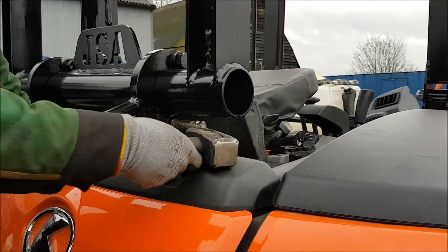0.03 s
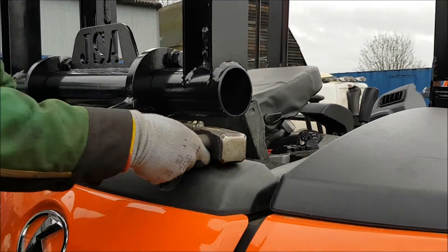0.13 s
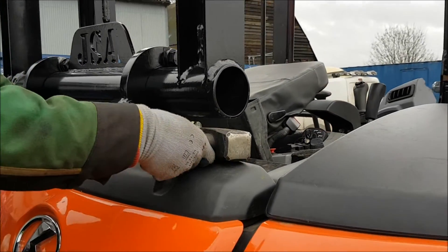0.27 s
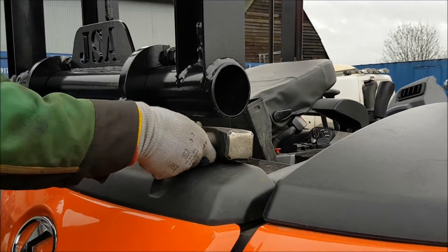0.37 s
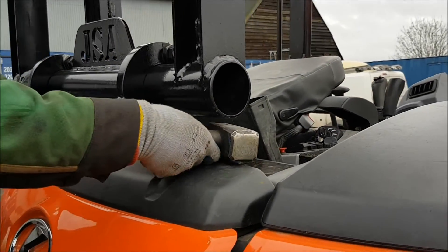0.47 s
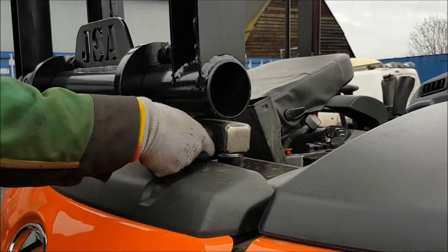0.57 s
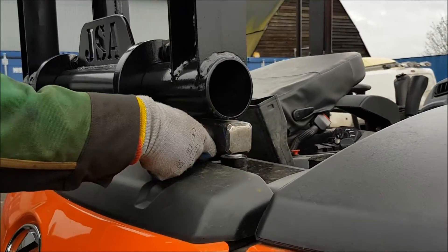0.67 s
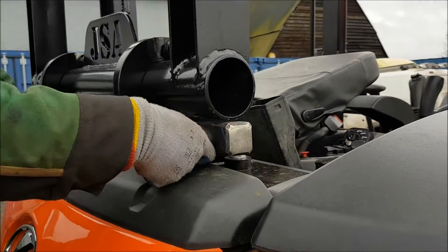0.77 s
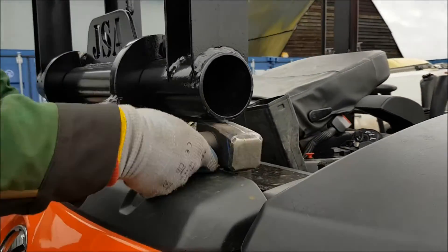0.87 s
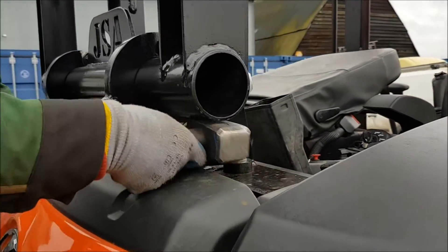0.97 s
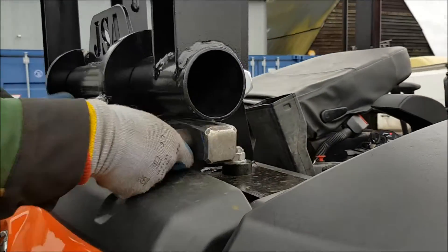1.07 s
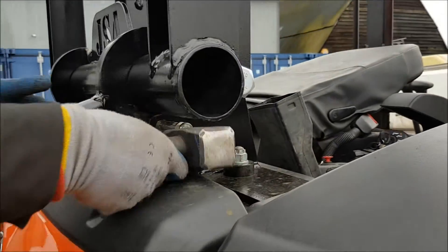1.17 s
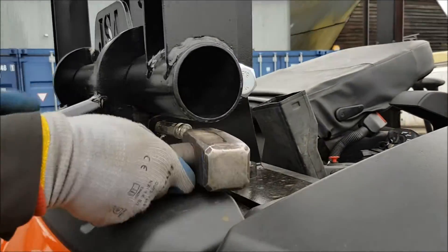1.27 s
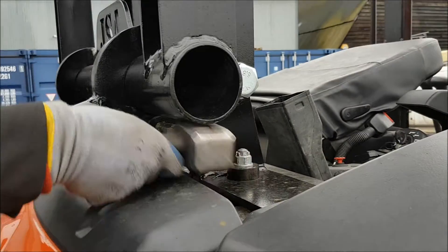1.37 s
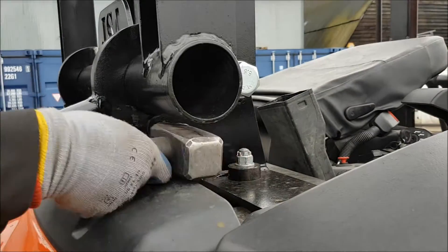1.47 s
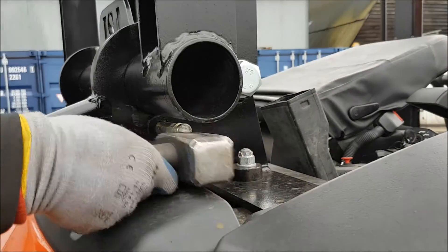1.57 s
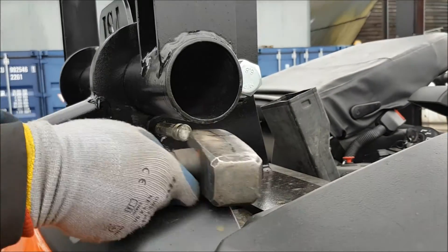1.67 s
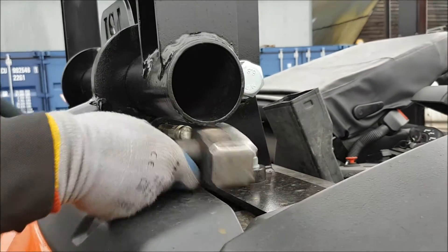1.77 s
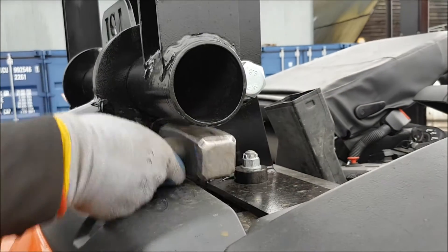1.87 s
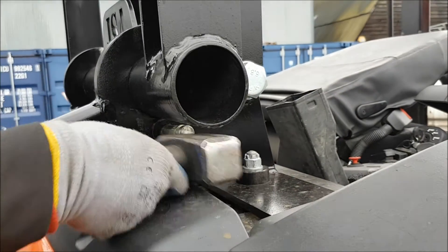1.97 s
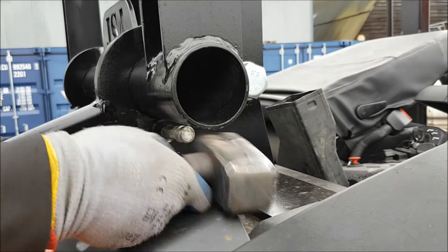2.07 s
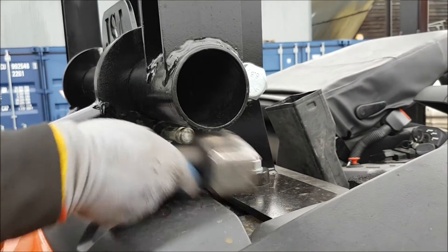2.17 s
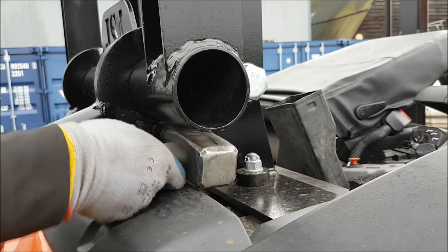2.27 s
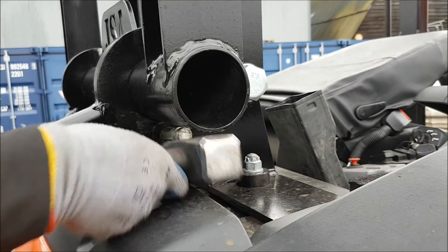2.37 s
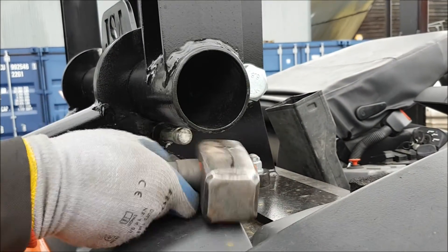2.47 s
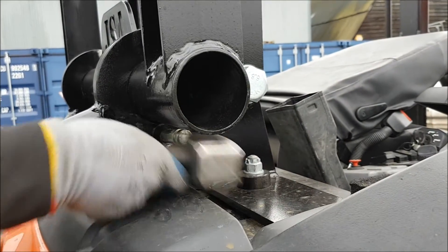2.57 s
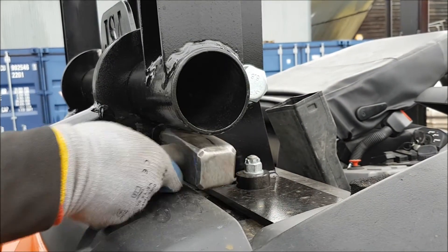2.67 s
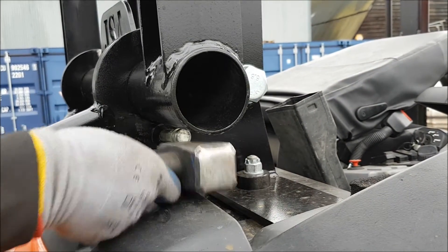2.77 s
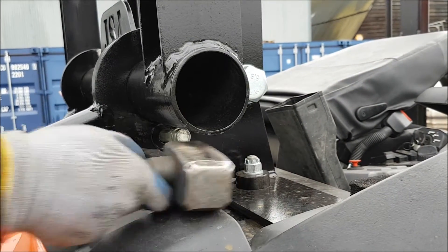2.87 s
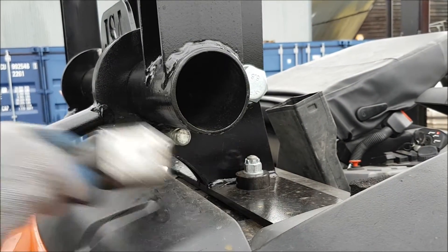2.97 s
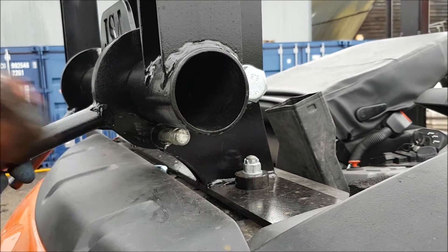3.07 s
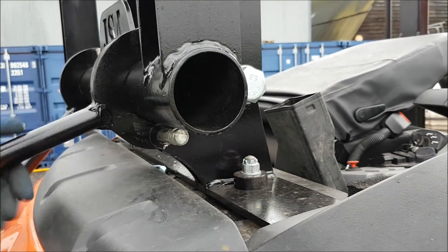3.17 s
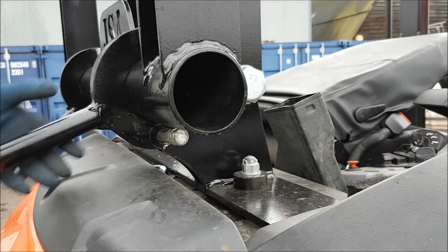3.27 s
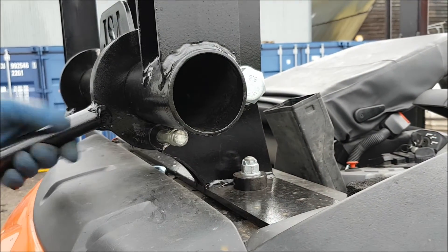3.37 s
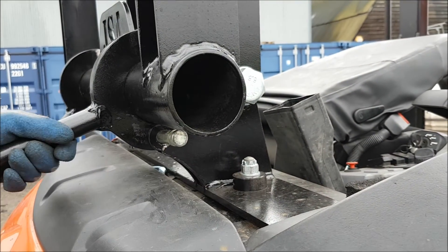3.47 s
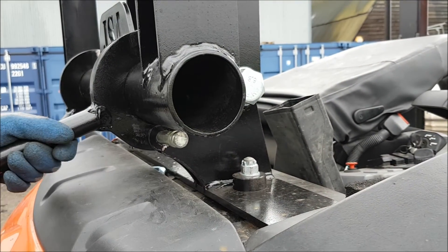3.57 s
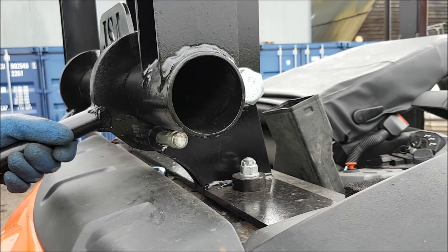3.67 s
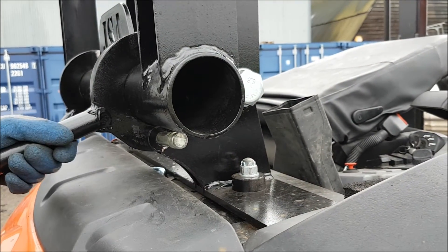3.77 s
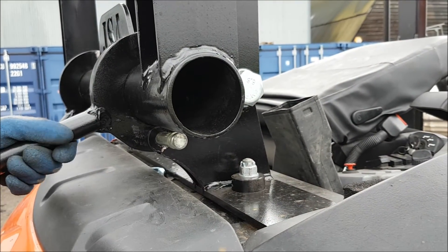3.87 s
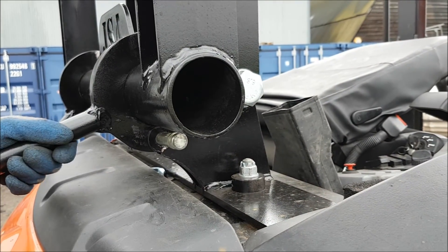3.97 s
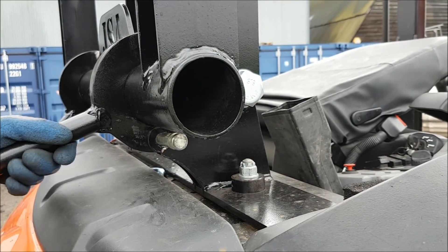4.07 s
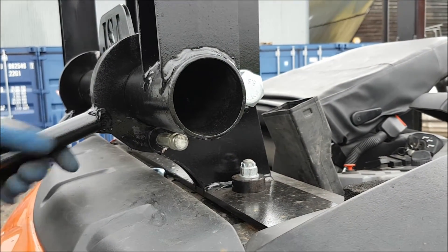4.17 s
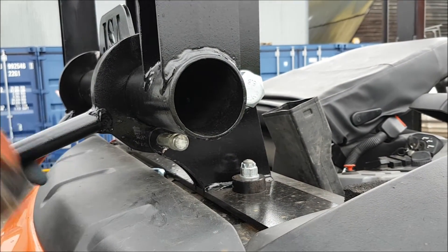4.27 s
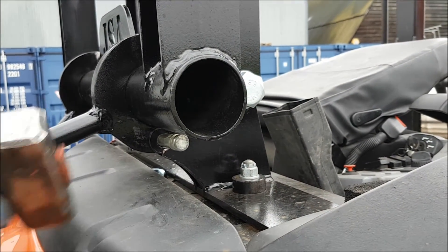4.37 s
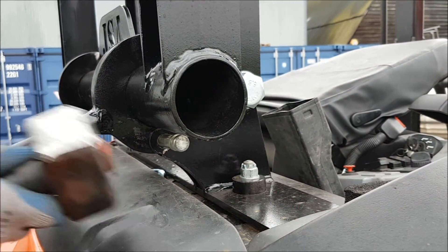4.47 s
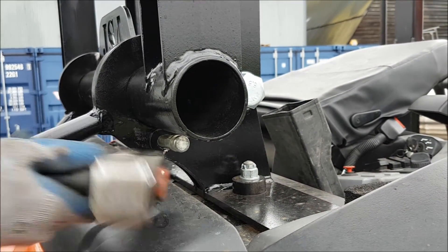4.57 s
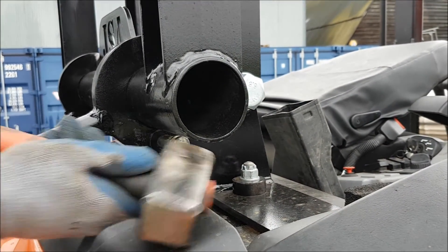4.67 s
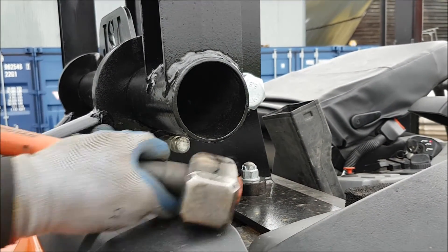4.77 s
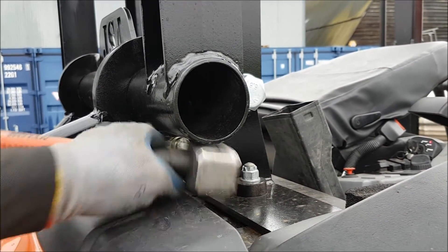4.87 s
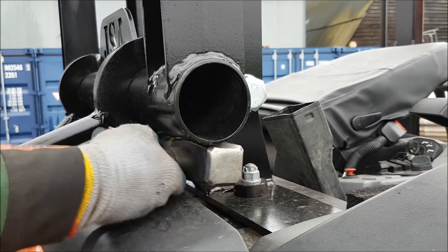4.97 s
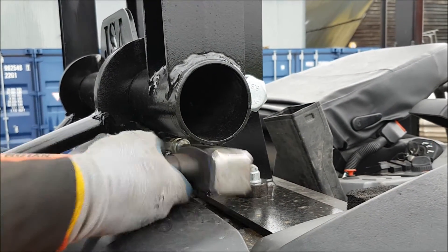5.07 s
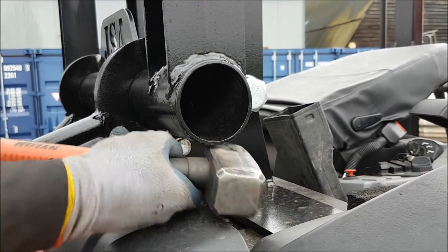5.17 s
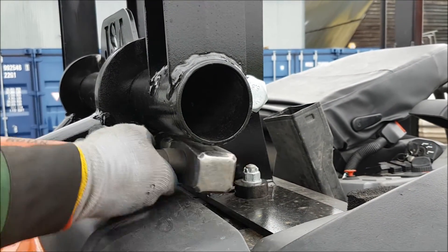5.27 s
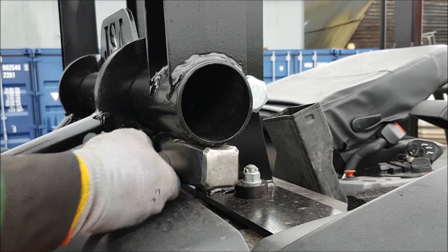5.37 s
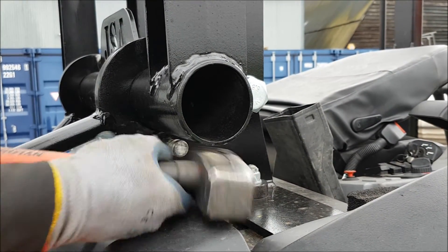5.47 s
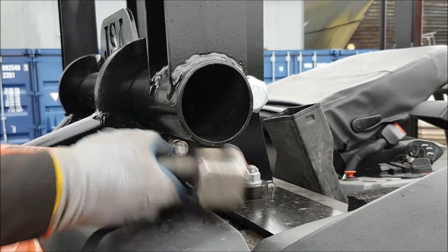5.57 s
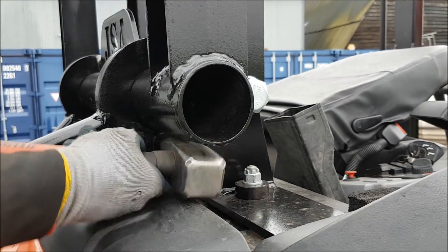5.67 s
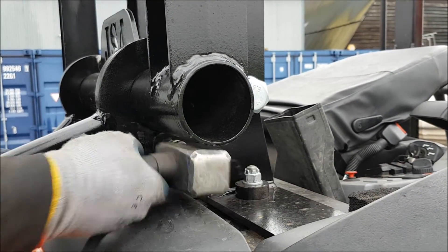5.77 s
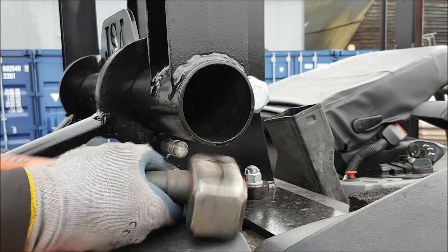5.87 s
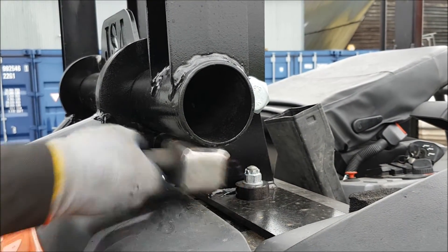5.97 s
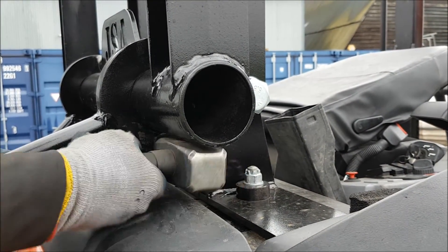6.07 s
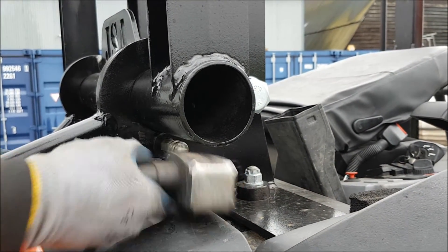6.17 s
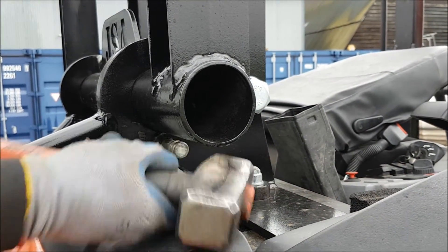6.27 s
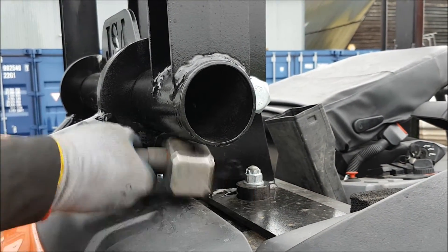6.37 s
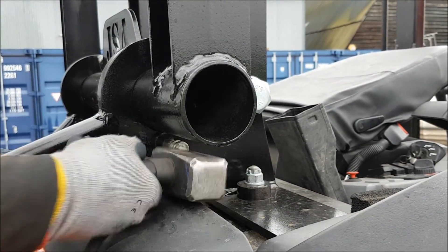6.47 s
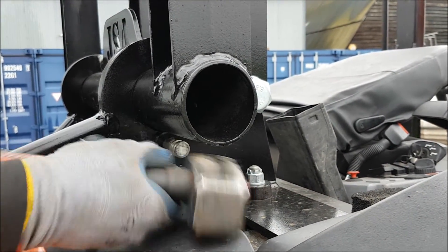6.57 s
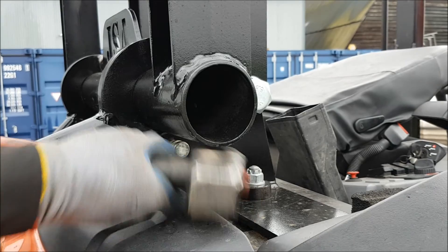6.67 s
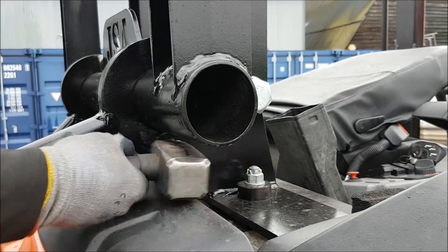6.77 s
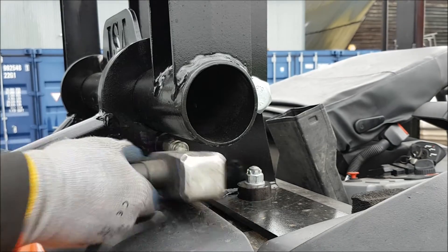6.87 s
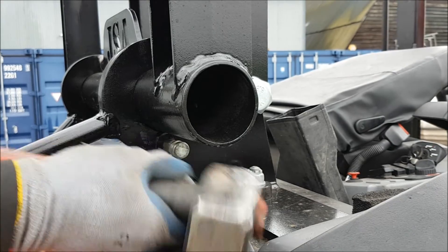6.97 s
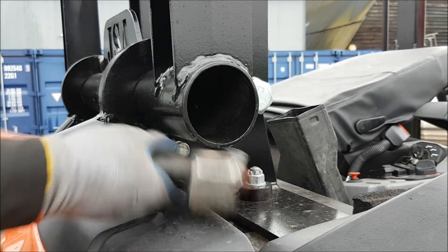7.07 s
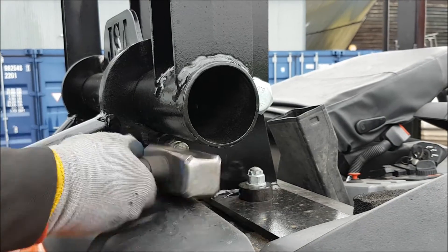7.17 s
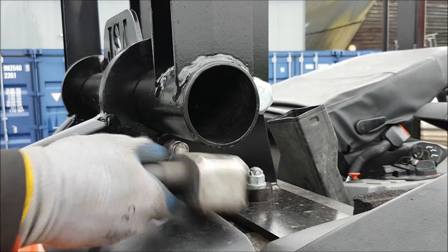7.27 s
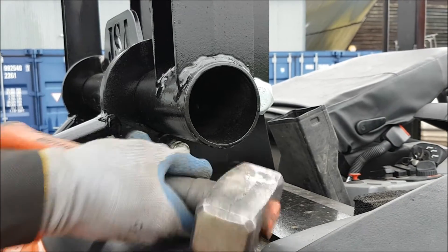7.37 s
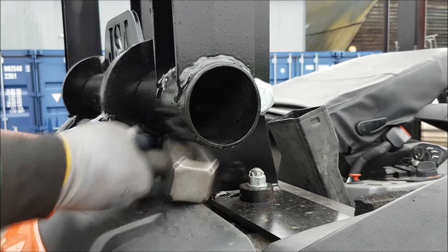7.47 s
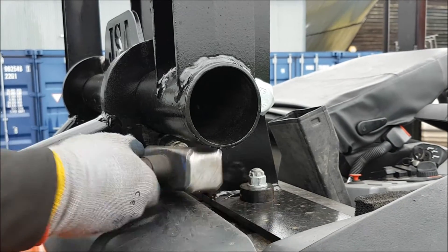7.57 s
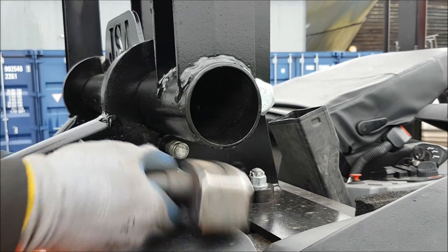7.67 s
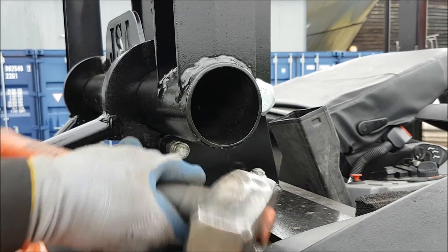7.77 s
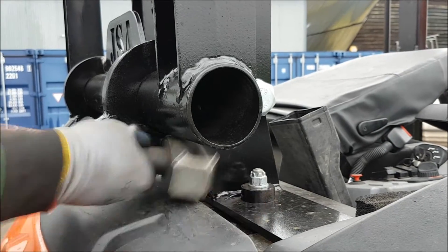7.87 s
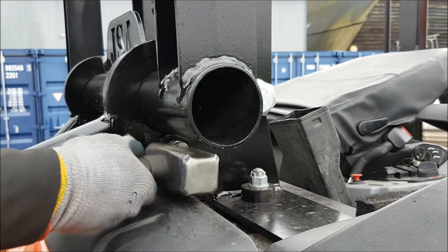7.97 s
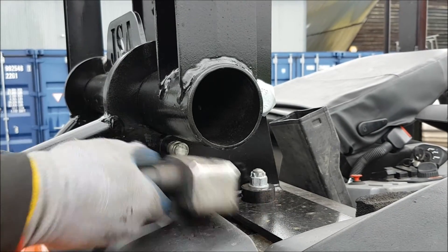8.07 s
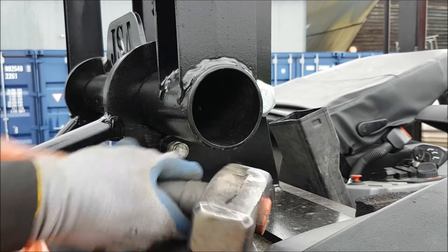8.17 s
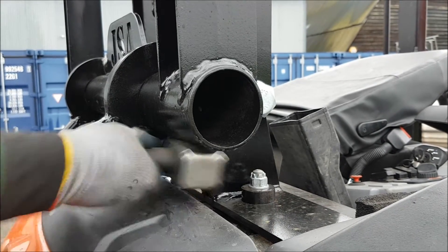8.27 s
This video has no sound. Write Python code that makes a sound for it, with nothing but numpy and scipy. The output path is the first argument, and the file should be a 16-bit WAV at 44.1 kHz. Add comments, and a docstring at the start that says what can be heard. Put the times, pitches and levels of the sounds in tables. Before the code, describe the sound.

A hammer drives a steel pin into a tractor frame outdoors, with sharp, clanging metal blows in two steady runs.

```python
"""A club hammer drives a steel hinge pin into a small tractor's lifting frame, outdoors, close to a phone.
Each blow cracks, clangs the bracket and rings through the bolted frame; some leave the pin singing.
The loose joint knocks before and after blows, the hammer bounces twice, and two blows land on the far side.
Two soft handling thumps and a gust hit the microphone at first; later there is only a light breeze.
A gloved hand bumps the bonnet, a forearm rubs it and a sleeve rustles over the steady sound of the yard."""
import sys
import numpy as np
from scipy import signal
from scipy.fft import rfft, irfft, next_fast_len
from scipy.io import wavfile
from scipy.ndimage import uniform_filter1d

SR = 44100
rng = np.random.default_rng(int(sys.argv[2]) if len(sys.argv) > 2 else 0)


def wav_out(sig):
    """Save sig, one row per channel (or a flat mono array), as 16-bit PCM at SR to the path in sys.argv[1]."""
    wavfile.write(sys.argv[1], SR, np.round(np.clip(np.atleast_2d(sig).T, -1, 1) * 32767).astype(np.int16))


N = 366471

# Levels in the tables are relative: each layer adds its own trim. Hardness is a treble gain.
# The tone of the frame's crowd of close modes. Each row: frequency in Hz, level in dB per third octave.
FRAME_COLOUR = [(50, -39.5), (110, -17.5), (160, -10), (220, -16.5), (320, -5.5), (500, -10), (750, -19),
                (1000, -10.5), (2000, -10), (2800, -12), (4000, -5), (5500, -13.5), (8500, -5), (11000, -6),
                (15000, -16)]
# The crowd's base envelope, which each kind of contact reshapes. Each row: frequency in Hz,
# rise in seconds, t60 in seconds, tail level in dB, tail t60 in seconds.
FRAME_DECAY = [(101.8, 0.0071, 0.6, -15, 1.3), (300, 0.0036, 0.25, -5, 0.86),
               (600, 0.00096, 0.35, -10.5, 1.07), (1180, 0.0013, 0.31, -17, 0.47),
               (2400, 0.00044, 0.21, -18, 0.54), (4807, 0.00046, 0.18, -24, 0.49),
               (14300, .0004, 0.14, -40, 1.4)]
# The frame's clear notes. Each row: pitch in Hz, t60 in seconds, level in dB when struck at the pin,
# level in dB when struck on the far side.
FRAME_MODES = [(93, 1.1, -33, -12.5), (123.5, 0.69, -19.5, -43), (154.7, 0.45, -26.5, -6.5),
               (296, 1.75, -19, -20), (332, 0.37, -14, -25.5), (389, 0.87, -28, -13.5),
               (423, 0.27, -30.5, -43), (531, 0.58, -13.5, -8), (589, 1, -19, -18.5),
               (638.5, 0.69, -18.5, -6.5), (669, 0.92, -26.5, -27), (1146, 0.2, -22.5, -32.5),
               (1440, 0.36, -19, -1.5), (1522, 0.29, -13, -12.5), (1663, 0.37, -12, -6),
               (1933, 0.2, -11, -5.5), (1967, 0.31, -14.5, -4), (2660, 0.23, -16.5, -17.5),
               (2584, 0.36, -16, -14), (3195, 0.16, -8, -28.5), (4140, 0.27, -30.5, -17.5),
               (4220, 0.27, -40.5, -17)]
# Blows lose their thud as the pin goes in. Each row: time in seconds, bass gain in dB.
THUD = [(0.65, 3), (1.45, 1), (2.65, -12), (8, -10.5)]
# Noise colours for yard, wind, forearm and sleeve. Each row: frequency in Hz, spectral density in dB.
YARD_COLOUR = [(15, -54), (25, -26.5), (135, -10), (219, -14.5), (293, 2.5), (354, -14.5), (438, -16.5),
               (588, -11.5), (833, -12), (1150, -17.5), (1720, -21), (3730, -35), (15000, -52)]
WIND_COLOUR = [(20, -21.5), (45, -5), (90, 2.5), (140, 1), (220, -3), (350, -10), (550, -21), (1000, -29.5),
               (2500, -64)]
RUB_COLOUR = [(40, -19.5), (130, -10.5), (300, 12), (450, 0.5), (700, -2.5), (3000, -41)]
SLEEVE_COLOUR = [(300, -3.5), (1000, 13.5), (3000, 11), (5000, 4.5), (9000, -0.5), (15000, -12.5)]
# Fader moves for the opening gust and the breeze after it. Each row: time in seconds, level in dB.
GUST = [(0.0, -27.5), (0.34, -51), (0.66, -29.5), (1.33, -33), (2.15, -48.5), (2.79, -57), (3.04, -66.5),
        (3.33, -62.5), (3.5, -44.5)]
BREEZE = [(4.4, -54), (4.87, -53.5), (8.3, -57.5)]
# The gust's strongest eddies. Each row: peak time in seconds, level in dB.
BIG_EDDIES = [(0.406, -15.5), (.497, -16.5), (0.53, -12), (0.851, -10)]
# Two soft handling thumps on the microphone at the start, then dull bumps on the bodywork.
# Each row: start in seconds, level in dB, hardness in dB.
BUMPS = [(0.003, -24.5, -18.5), (0.024, -28.5, -21), (0.062, -34.5, -7), (0.111, -29, -3.5),
         (3.539, -42.5, -26), (4.436, -49, -31.5), (4.713, -28, -9.5), (4.742, -32.5, -11),
         (4.792, -34, -13), (6.291, -36.5, -10.5), (6.667, -40.5, -15), (6.9, -32, -11), (7.041, -36, -16),
         (7.289, -31, -13), (7.811, -40.5, -13.5), (8.093, -30.5, -11), (8.224, -34, -10.5)]
# Arm movements. Each row: start in seconds, length in seconds, bonnet rub in dB, sleeve rustle in dB.
ARM_MOVES = [(0.207, 0.19, -38, -58), (0.46, 0.92, -37.5, -53.5), (0.76, 0.59, -30.5, -54),
             (1.5, 0.93, -52.5, -71), (3.153, .05, -70, -66), (4.749, 0.08, -32, -60),
             (4.886, 0.13, -53, -40), (5.05, 2.05, -42, -66), (7.25, 1.04, -52, -61.5)]
# Hammer on pin. Each row: start in seconds, level in dB, hardness in dB, bracket clang in dB,
# the struck spot's resonance in Hz, its strength in dB. Hardness, clang and strength ride on the level.
PIN_BLOWS = [(0.647, -12.5, -6.5, -18, 7580, -6), (1.059, -12, -6.5, -8, 6590, 0.5),
             (1.454, -13, -4, -1, 3410, -5.5), (1.872, -19, 0.5, 1, 7570, 6),
             (2.266, -15, -3.5, -2, 8140, -2.5), (2.651, -15, -3, -2.5, 2200, 0),
             (4.958, -9, -5.5, -8, 9300, -8), (5.309, -13.5, -5, 8.5, 8670, -0.5),
             (5.676, -12.5, -5, -1.5, 2590, 0), (6.042, -13, -4.5, -6.5, 2670, 5.5),
             (6.414, -14.5, -4.5, -2, 2866, 2), (6.774, -14.5, -5, 0.5, 3090, 3.5),
             (7.164, -15, -3.5, -1.5, 8740, -3), (7.553, -17.5, 0.5, -2.5, 2704, 6.5),
             (7.957, -16.5, 0.5, -26, 8800, -3)]
# The bracket round the pin. Each row: pitch in Hz, t60 in seconds, level in dB.
BRACKET_MODES = [(959.4, 0.082, -0.5), (939, 0.11, 2.5), (1013, 0.086, -2.5), (1060, 0.54, -16.5),
                 (847, 0.017, -4)]
# Slack in the joint. Each row: start in seconds, level in dB, hardness in dB.
JOINT_KNOCKS = [(0.946, -21.5, -17), (1.429, -25, -15.5), (1.844, -36, -8), (2.421, -31, -13.5),
                (2.794, -26, -9.5), (4.945, -15.5, -6.5), (5.268, -32, -10), (5.641, -33.5, -7),
                (5.801, -22.5, -10.5), (6.017, -23.5, -8.5), (6.159, -25.5, -11), (6.373, -26.5, -8.5),
                (6.743, -19, -7.5), (7.136, -21, -9), (7.524, -16, -4.5), (7.682, -24.5, -7.5),
                (7.941, -21, -6.5)]
# The pin singing on. Each row: start in seconds, pitch in Hz, t60 in seconds, level in dB.
PINGS = [(1.872, 6944, 0.4, -39), (2.267, 6944, 0.6, -49), (4.959, 6934, 0.35, -30),
         (6.042, 5670, 0.77, -50), (6.042, 10680, 1.1, -76), (6.414, 5720, 0.43, -41),
         (6.773, 5750, 0.57, -50), (7.165, 3989, 1.2, -54.5), (7.165, 10620, 1.1, -66)]
# Hammer bounces. Each row: start in seconds, level in dB, hardness in dB, clang in dB over the level.
REBOUNDS = [(2.329, -22.5, -3.5, 3), (2.718, -22, -0.5, 0)]
# Hammer on the far side of the frame. Each row: start in seconds, level in dB, hardness in dB.
FAR_BLOWS = [(3.581, -12.5, -5.5), (3.928, -14.5, -3.5)]

BAND_HZ = 50 * 2 ** (np.arange(26) / 3)
ZONE_HZ = [330, 520, 2600, 3600, 6500, 8600]  # EQ corners between thud, body, bite and sizzle
RING_TIME = np.arange(SR * 4 // 5) / SR  # seconds since a contact


def undb(db):
    """Decibels to gain."""
    return np.exp(np.asarray(db) * np.log(10) / 20)


def at_hz(table, hz):
    """The columns of a table over frequency, read on a log axis."""
    knots, *columns = np.transpose(table)
    return [np.interp(np.log(hz), np.log(knots), c) for c in columns]


def add(out, s, sound):
    """Drop a sound into the mix at s seconds."""
    start = max(int(s * SR), 0)
    out[:, start:start + sound.shape[1]] += sound[:, :N - start]


def port_noise(size, alike_hz):
    """White noise spectrum at two microphone ports: centred in the bass, wide in the treble."""
    hz = np.arange(size // 2 + 1) * SR / size + 1e-3
    mid, side = rfft(rng.standard_normal((2, size)))
    alike = 1 / (1 + (hz / alike_hz) ** 2)
    return hz, np.sqrt(1 + alike) * mid + np.sqrt(1 - alike) * side * np.array([[1], [-1]])


def coloured(colour, alike_hz):
    """Stereo noise of unit level in a given colour."""
    size = next_fast_len(N, real=True)
    hz, noise = port_noise(size, alike_hz)
    shaped = irfft(noise * undb(at_hz(colour, hz)[0]), size)[:, :N]
    return shaped / shaped.std()


def wobble(rate_hz):
    """A modulator gliding between random values, with a spread near 1."""
    hold = int(SR / rate_hz)
    steps = np.repeat(rng.standard_normal(N // hold + 1), hold)
    return 1.2 * uniform_filter1d(steps, hold)[:N]


def yard():
    """The outdoor bed: low, steady noise that barely wavers."""
    return coloured(YARD_COLOUR, alike_hz=400) * undb(-49.5 + 0.61 * wobble(3.5))


def wind(eddies_per_s=4.6, eddy_half_s=0.014):
    """Gusty air buffets each port on its own; eddies are short swells of pressure, most of them small."""
    t = np.arange(N) / SR
    eddy = lambda when: np.maximum(1 - np.abs(t - when) / eddy_half_s, 0)
    waits, sizes = rng.random((90, 2)).T
    times = np.cumsum(.5 + waits) / eddies_per_s
    small_eddies = sum(size ** 2 * eddy(when) for when, size in zip(times, sizes))
    big_eddies = sum(undb(db) * eddy(s) for s, db in BIG_EDDIES)
    flow = undb(9 + np.interp(t, *np.vstack([GUST, BREEZE]).T))
    pressure = flow * np.hypot(undb(2.7 * wobble(28)), undb(10) * small_eddies)
    return coloured(WIND_COLOUR, alike_hz=15) * np.hypot(pressure, big_eddies)


def mode_crowd(size, bunching):
    """The frame's countless close modes as third-octave noises of unit level: bands x ports x samples."""
    hz, noise = port_noise(size, alike_hz=890)
    thirds_off = np.clip(3 * np.log2(hz / BAND_HZ[:, None]), -1, 1)
    band_shapes = np.sqrt(1 - np.abs(thirds_off))[:, None]
    bands = irfft(noise * undb(at_hz(bunching, hz)[0]) * band_shapes, size)
    return bands / bands.std(axis=(1, 2), keepdims=True)


def ring_down(stretch, chatter_s, rise_scale, linger_db, crack_db):
    """Band envelopes: lows bloom late, the joint chatters briefly, then a fast decay and a long tail."""
    rise, t60, tail_db, tail_t60 = (c[:, None] for c in at_hz(FRAME_DECAY, BAND_HZ))
    free_s = np.hypot(RING_TIME, chatter_s) - chatter_s  # chatter holds off the decay
    body = undb(-60 * free_s / (t60 * stretch))
    tail = undb(tail_db + linger_db - 60 * free_s / tail_t60)
    crack = undb(crack_db) * np.exp(-RING_TIME / 0.0017)
    attack = 1 - np.exp(-RING_TIME / (rise * rise_scale))
    fade = np.minimum(4 * (RING_TIME[-1] - RING_TIME), 1)
    envelope = (np.hypot(body, tail) + crack) * attack * fade
    opening_power = np.mean(envelope[:, :SR // 25] ** 2, axis=1, keepdims=True)
    return envelope / np.sqrt(opening_power)


def contact(frame, loose, envelope, thud_db, hardness, top_db, rattle):
    """One hit: the frame's own response, plus a share that rattles differently every time."""
    sizzle_db = top_db + 1.55 * hardness  # a harder contact is shorter, so the top rises fastest
    eq_db = np.interp(np.log(BAND_HZ), np.log(ZONE_HZ), [thud_db, 0, 0, hardness, hardness, sizzle_db])
    gain = undb(eq_db + at_hz(FRAME_COLOUR, BAND_HZ)[0])[:, None] * envelope
    start = rng.integers(len(RING_TIME) // 2)
    fresh = loose[..., start:start + len(RING_TIME)]
    bands = np.sqrt(1 - rattle) * frame + np.sqrt(rattle) * fresh
    return np.sum(gain[:, None] * bands, axis=0)


def bumps(frame, loose):
    """Two handling thumps on the microphone, then damped bumps on the bodywork; softer ones thud more."""
    out = np.zeros((2, N))
    envelope = ring_down(stretch=0.41, chatter_s=0.0024, rise_scale=0.059, linger_db=-16, crack_db=-1.5)
    for s, db, hardness in BUMPS:
        thud_db = 2.5 - 0.67 * hardness
        bump = contact(frame, loose, envelope, thud_db, hardness, top_db=-2, rattle=1)
        add(out, s, undb(db - 11) * bump)
    return out


def arm(attack_s=0.039, release_s=0.053):
    """With each movement the forearm rubs the bonnet and the sleeve rustles."""
    t = np.arange(N) / SR
    rub = rustle = 0
    for s, length, rub_db, rustle_db in ARM_MOVES:
        move = np.exp(np.minimum(t - s, 0) / attack_s - np.maximum(t - s - length, 0) / release_s)
        rub = np.hypot(rub, undb(rub_db) * move)
        rustle = np.hypot(rustle, undb(rustle_db) * move)
    bonnet = coloured(RUB_COLOUR, alike_hz=600) * rub * undb(3.2 * wobble(35) - 1)
    sleeve = coloured(SLEEVE_COLOUR, alike_hz=900) * rustle * undb(4.9 * wobble(25))
    return bonnet + sleeve


def thud_at(s):
    """Bass of a hit in dB, by how far the pin has gone in."""
    return np.interp(s, *np.transpose(THUD))


def tone(hz, t60):
    """A dying mode; shorter waves can land further out of phase between the ports."""
    t = np.arange(int(t60 * SR)) / SR
    skew = rng.uniform(-1.71, 1) * min(hz / 2500, np.pi / 2)
    phase = np.pi * rng.integers(2) + np.array([[skew], [-skew]])
    return np.sin(2 * np.pi * hz * t + phase) * np.exp(-np.log(1000) * t / t60)


def add_frame_ring(out, s, mode_db, scatter_db=2.06, swell_cycles=2.5):
    """The frame's clear modes swell over a few cycles, in a slightly new balance at each blow."""
    levels = mode_db + scatter_db * rng.standard_normal(len(FRAME_MODES))
    for (hz, t60, _, _), db in zip(FRAME_MODES, levels):
        mode = tone(hz, t60)
        swell = 1 - np.exp(-np.arange(mode.shape[1]) / SR * hz / swell_cycles)
        add(out, s, undb(db) * mode * swell)


def add_bracket_clang(out, s, db):
    """The bracket clangs in close modes whose pitch shifts with the pin's seating."""
    seating = 1 + .012 * rng.standard_normal()
    for hz, t60, mode_db in BRACKET_MODES:
        add(out, s, undb(db + mode_db) * tone(hz * seating, t60))


def pin_blows(frame, loose):
    """Blows on the pin shake frame and bracket; the struck spot adds a short cluster of high modes."""
    out = np.zeros((2, N))
    pin_db = np.transpose(FRAME_MODES)[2]
    envelope = ring_down(stretch=0.96, chatter_s=0.012, rise_scale=1, linger_db=-3, crack_db=2.5)
    for s, db, hardness, clang_db, spot_hz, spot_db in PIN_BLOWS:
        crash = contact(frame, loose, envelope, thud_at(s), hardness, top_db=-4.5, rattle=0.59)
        add(out, s, undb(db - 3) * crash)
        add_frame_ring(out, s, db + pin_db)
        add_bracket_clang(out, s, db + clang_db)
        for detune in 0.065 * rng.standard_normal(18):
            add(out, s, undb(db + spot_db - 11) * tone(spot_hz * (1 + detune), t60=0.15))
    return out


def joint_knocks(frame, loose):
    """The loose joint knocks softly as it takes up slack before a blow, and as it drops back."""
    out = np.zeros((2, N))
    envelope = ring_down(stretch=1, chatter_s=.003, rise_scale=1, linger_db=-7, crack_db=-14)
    for s, db, hardness in JOINT_KNOCKS:
        knock = contact(frame, loose, envelope, thud_at(s) - 8, hardness, top_db=-13.5, rattle=0.99)
        add(out, s, undb(db - 4) * knock)
    return out


def pin_pings():
    """When the hammer comes away cleanly, the pin sings on in thin high tones."""
    out = np.zeros((2, N))
    for s, hz, t60, db in PINGS:
        add(out, s, undb(db) * tone(hz, t60)[:1])  # mono
    return out


def rebounds(frame, loose):
    """The hammer bounces back onto the pin and touches only briefly, so its clack is drier."""
    out = np.zeros((2, N))
    envelope = ring_down(stretch=0.76, chatter_s=.002, rise_scale=0.16, linger_db=-4, crack_db=0.5)
    for s, db, hardness, clang_db in REBOUNDS:
        clack = contact(frame, loose, envelope, thud_at(s), hardness, top_db=-9, rattle=0.72)
        add(out, s, undb(db - 3) * clack)
        add_bracket_clang(out, s, db + clang_db)
    return out


def far_blows(frame, loose):
    """From the far side the shock has to cross the joints, so it swells and chatters longer."""
    out = np.zeros((2, N))
    far_db = np.transpose(FRAME_MODES)[3]
    envelope = ring_down(stretch=1.1, chatter_s=0.029, rise_scale=4.7, linger_db=1, crack_db=13)
    for s, db, hardness in FAR_BLOWS:
        crash = contact(frame, loose, envelope, thud_at(s), hardness, top_db=-8.5, rattle=0.088)
        add(out, s, undb(db) * crash)
        add_frame_ring(out, s, db + far_db - .7)
    return out


def scene():
    """The hits sit a touch left of centre, over wind, arm and yard."""
    # treble modes bunch at random, leaving narrow peaks and gaps
    bunching = np.transpose([np.linspace(1000, 16000, 260), 2.5 * rng.standard_normal(260)])
    frame = mode_crowd(len(RING_TIME), bunching)
    loose = mode_crowd(len(RING_TIME) * 3 // 2, bunching)  # longer, so each rattle takes a new slice
    layers = (pin_blows, rebounds, far_blows, joint_knocks, bumps)
    hits = sum(layer(frame, loose) for layer in layers) + pin_pings()
    pan = undb([[0.2], [-0.2]])
    return hits * pan + wind() + arm() + yard()


def record(dry):
    """The phone rounds the tallest peaks and cuts the top."""
    ceiling, top_hz = .85, 15900
    high_cut = signal.ellip(10, .2, 70, top_hz, fs=SR, output="sos")
    return signal.sosfilt(high_cut, ceiling * np.tanh(dry / ceiling))


dry = scene()
out = record(dry)
wav_out(out)
```